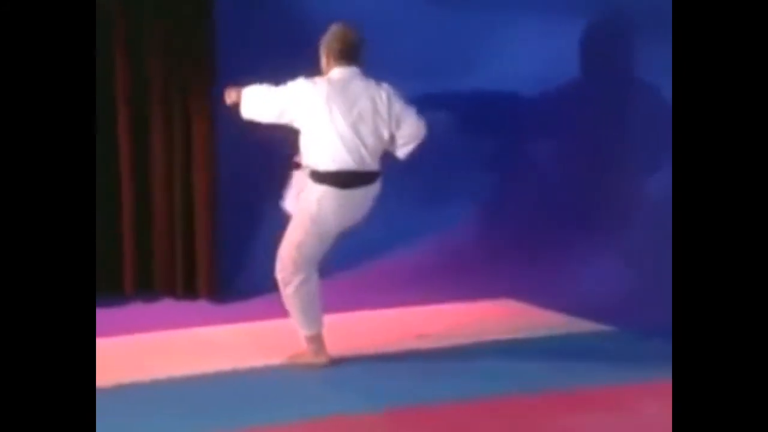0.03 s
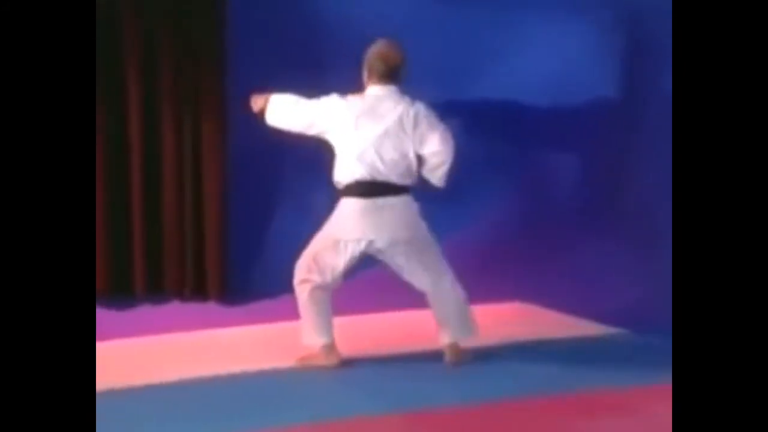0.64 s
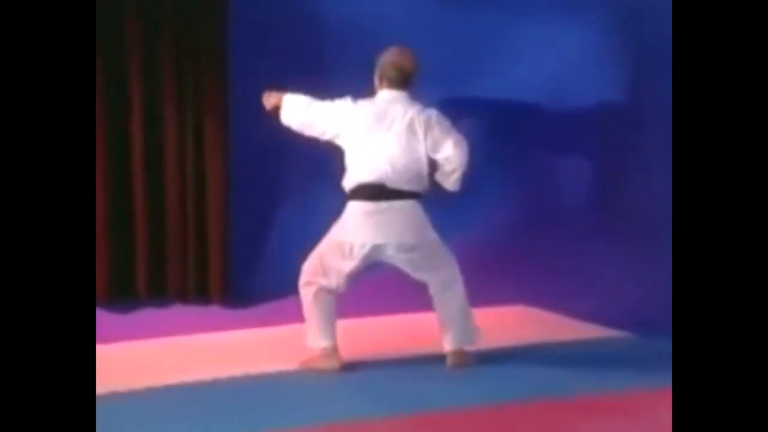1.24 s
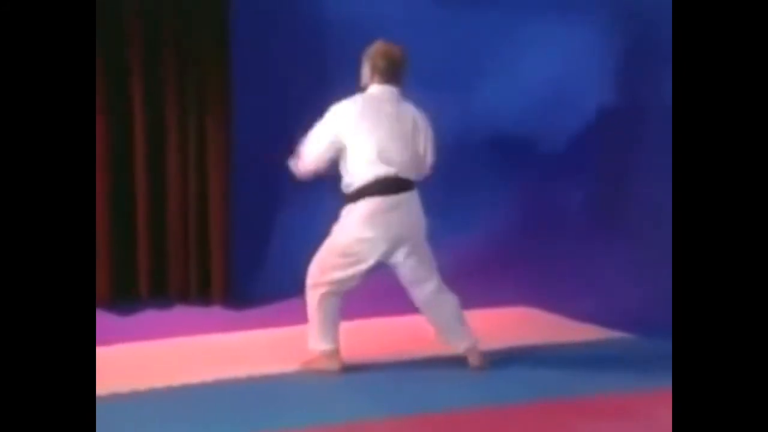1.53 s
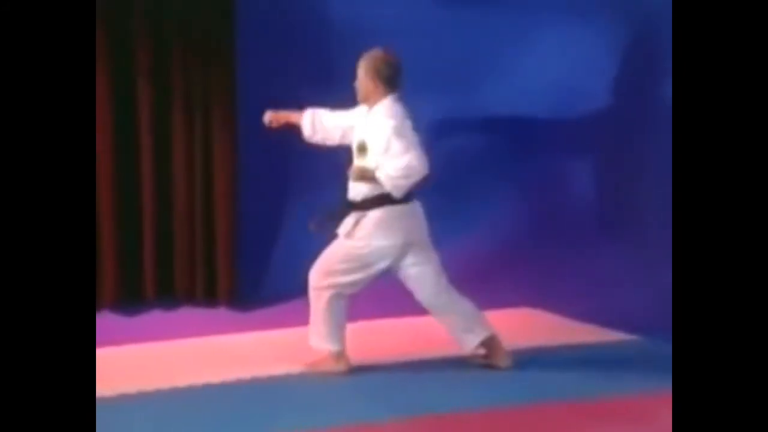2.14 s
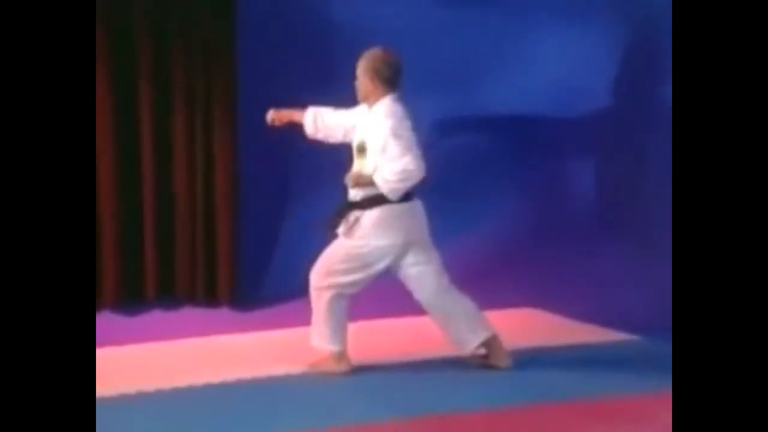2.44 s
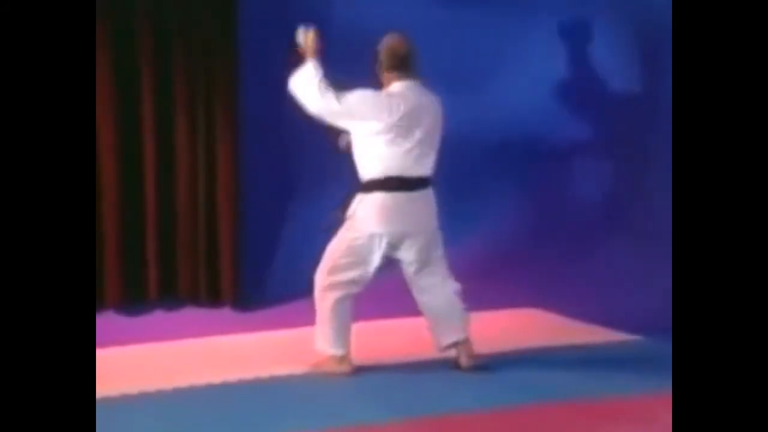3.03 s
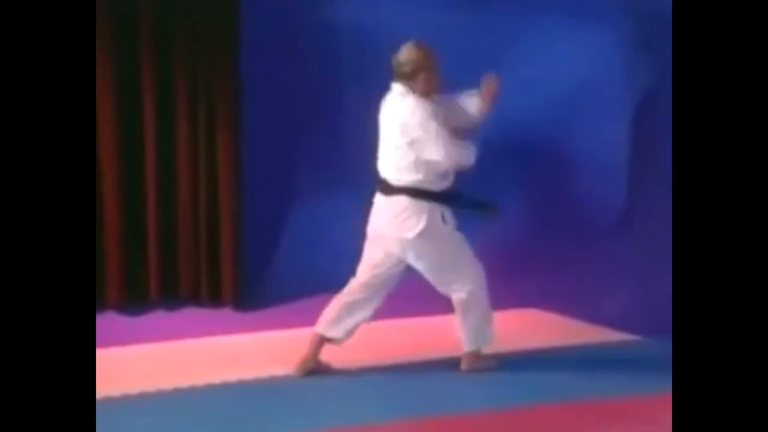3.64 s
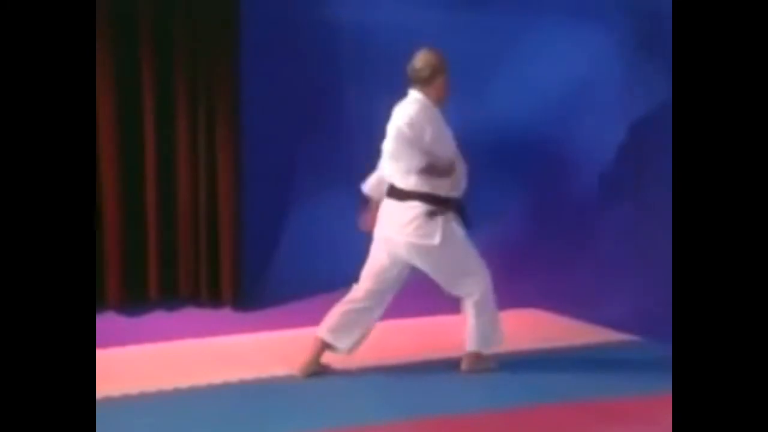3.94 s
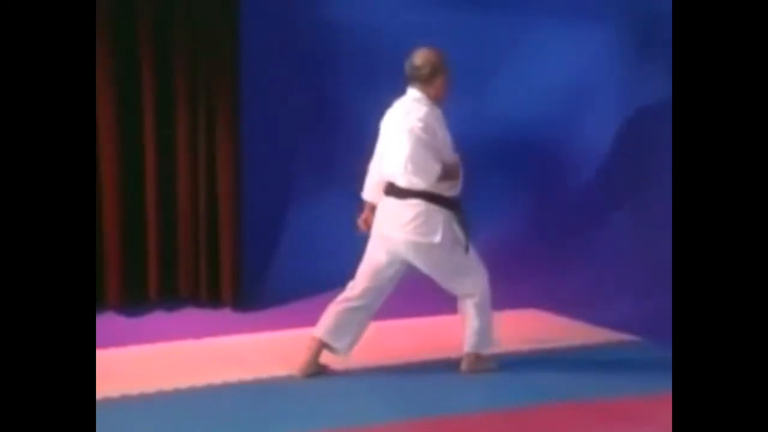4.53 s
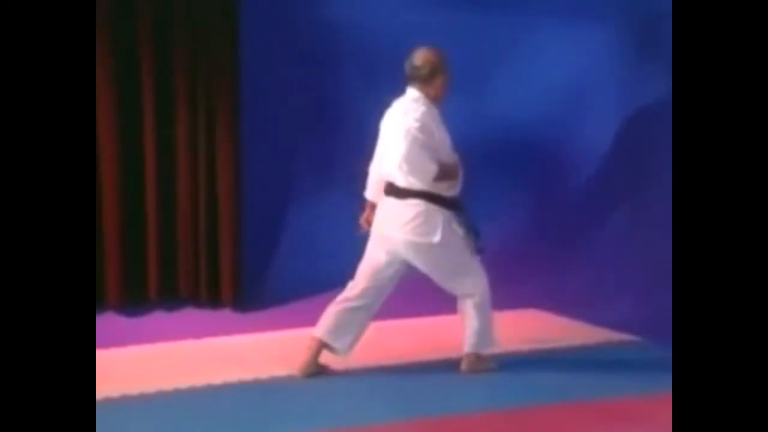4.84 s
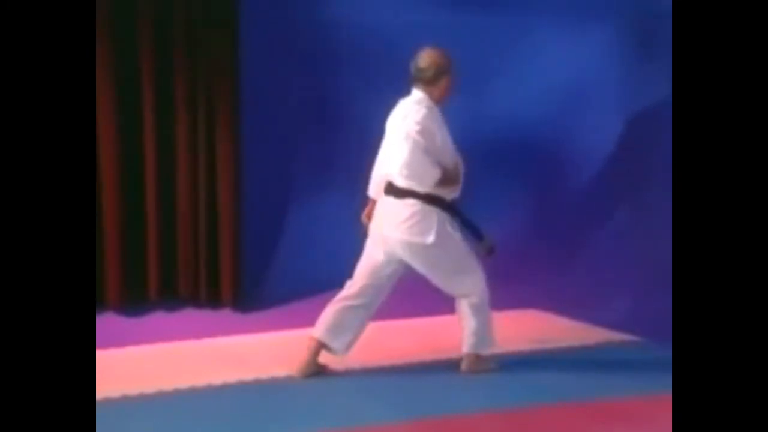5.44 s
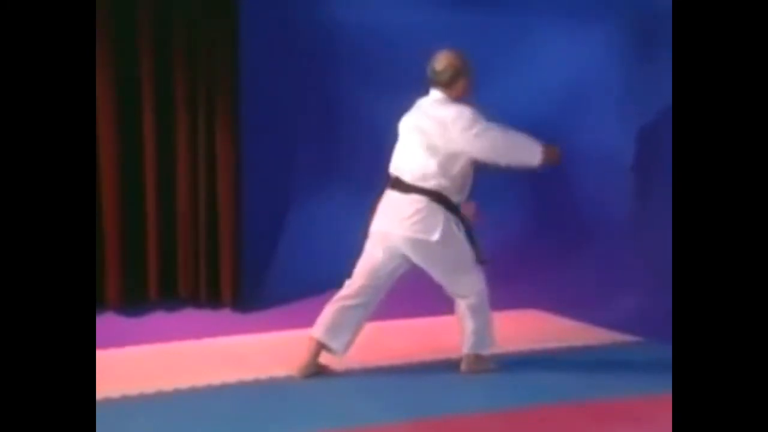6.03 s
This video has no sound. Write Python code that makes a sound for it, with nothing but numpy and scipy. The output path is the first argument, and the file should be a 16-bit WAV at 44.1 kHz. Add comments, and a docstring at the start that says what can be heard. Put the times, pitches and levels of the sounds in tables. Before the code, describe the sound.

In a ringing indoor hall, a bare foot stamps once on a mat. Thick cotton sleeves whoosh and crack taut with fast arm strikes, then bare soles scuff and step lightly before a second, weaker burst of flapping. After a pause the cloth rustles again briefly. The microphone is some way off, with steady electrical hum, rumble and faint hiss underneath.

```python
"""A barefoot martial artist stamps and strikes through a form on a padded mat in a hall.
The foot thuds on the mat, its skin slaps the cover, and the soles scuff as the feet shift.
With each arm strike the heavy cotton uniform rubs, swishes and flaps as it pulls taut.
The hall rings on; low rumble, mains hum, hiss and a thin electronic whine lie underneath."""
import sys
import numpy as np
from scipy import signal
from scipy.fft import rfft, irfft
from scipy.io import wavfile

SR = 44100
rng = np.random.default_rng(int(sys.argv[2]) if len(sys.argv) > 2 else 0)


def store_pcm(level_fs):
    """Save levels as 16-bit WAV."""
    pcm = np.round(np.clip(level_fs, -1, 1) * 32767).astype(np.int16)
    wavfile.write(sys.argv[1], SR, np.atleast_2d(pcm).T)


N = 276697


def gain_of(db):
    """Turns decibels into a number to multiply a sound by."""
    return 10 ** (np.asarray(db) / 20)


def evened(x):
    """Scales a signal to an average (rms) level of 1."""
    return x / np.sqrt(np.mean(x ** 2) + 1e-20)


def curve_at(points, hz):
    """Joins (Hz, value) points by straight lines on a log-frequency axis."""
    point_hz, value = np.transpose(points)
    return np.interp(np.log(hz + 1), np.log(point_hz + 1), value)


def add(mix, start_s, sound):
    """Mixes a sound in at its start time."""
    part = mix[max(round(start_s * SR), 0):][:len(sound)]
    part += sound[:len(part)]


def coloured(noise, colour):
    """Gives a long noise a colour (its balance of low and high), at level 1."""
    gain = gain_of(curve_at(colour, np.fft.rfftfreq(N, 1 / SR)))
    return evened(irfft(rfft(noise) * gain, N))


def click_of(colour, size=4096):
    """A click of this colour that starts at once and peaks at 1."""
    log_gain = np.log(gain_of(curve_at(colour, abs(np.fft.fftfreq(size, 1 / SR)))))
    spectrum = np.exp(np.conj(signal.hilbert(log_gain)))  # packs the energy at the start
    click = np.fft.ifft(spectrum).real[:size // 2]
    return click / abs(click).max()


def drift(rate_hz):
    """A slow random wobble, at level 1."""
    hz = np.fft.rfftfreq(N, 1 / SR)
    return evened(irfft(rfft(rng.standard_normal(N)) * np.exp(-(hz / rate_hz) ** 2), N))


def burst(click, decay_s, scatter):
    """A click trailed by smaller ones as the contact spreads."""
    t = np.arange(SR // 20) / SR
    contacts = scatter * rng.standard_normal(len(t)) * np.exp(-t / decay_s)
    contacts[0] = 1
    return signal.fftconvolve(contacts, click)


def short_note(hz, ring_s, rise_s):
    """A note that starts softly and dies within a few cycles."""
    t = np.arange(SR // 10) / SR
    return np.sin(2 * np.pi * hz * t) * np.exp(-t / ring_s) * (1 - np.exp(-t / rise_s))


# The colour of the room's noise. Each row: frequency in Hz, relative level in dB.
ROOM_COLOUR = [(10, -36.5), (28, -12.5), (45, -6), (70, -8.5), (90, -9), (130, -10.5), (170, -16),
               (250, -21), (400, -31.5), (750, -43), (1600, -49.5), (3200, -54.5), (6800, -56.5),
               (7900, -54), (9500, -60), (14000, -57.5)]
# How alike that noise is left and right. Each row: frequency in Hz, likeness (1 is identical).
ROOM_LIKENESS = [(30, 0.74), (150, 0.97), (600, 1), (2000, 0.99), (4000, 0.95), (8000, 0.59), (14000, 0.17)]
# Electrical tones. Each row: pitch in Hz, level in dB, left's lead in radians, waver in radians.
HUM_AND_WHINE = [(58.05, -50.5, 0.33, 0.49), (118.6, -59, .1, 0.96), (5330, -99, 0.52, 0.56),
                 (7868, -79, 0.37, .8), (14185, -89.5, 0.88, 1.1)]

def background(noise_db=-60):
    """The room rumbles and hisses while the electrical hum and whine waver."""
    hz, t = np.fft.rfftfreq(N, 1 / SR), np.arange(N) / SR
    left, other = rfft(rng.standard_normal((2, N)))
    likeness = np.clip(curve_at(ROOM_LIKENESS, hz), -1, 1)
    right = likeness * left + np.sqrt(1 - likeness ** 2) * other
    colour = gain_of(curve_at(ROOM_COLOUR, hz))
    mid_level = np.std(irfft(left * colour * (hz > 150) * (hz < 7000), N))
    out = gain_of(noise_db) / mid_level * irfft(np.array([left, right]) * colour, N)
    for tone_hz, db, lead, waver in HUM_AND_WHINE:
        phase = 2 * np.pi * tone_hz * t + waver * drift(15)
        out += np.sqrt(2) * gain_of(db + drift(10)) * np.sin([phase + lead, phase])
    lean_db = curve_at([(60, 1.3), (200, 0.0), (600, 0)], hz)  # the rumble leans left
    return irfft(rfft(out) * gain_of([lean_db, -lean_db]), N)


# How long the hall rings. Each row: frequency in Hz, seconds to fade by 60 dB.
HALL_FADE = [(60, 1.0), (170, 0.96), (350, 0.63), (1000, 0.66), (3000, 0.71), (5500, 0.47), (9000, 0.32)]
# Echoes off the walls and ceiling. Each row: delay in seconds, relative level in dB.
WALL_ECHOES = [(0.0135, -13.5), (0.0234, -9), (0.0364, -10), (.048, -19), (0.073, -10.5), (0.081, -9.5)]

def hall(sound, echo_db, tail_db, build_s=0.0079, dull_above_hz=1800):
    """The hall adds a few dull, scattered echoes, then a dense tail whose treble dies first."""
    hz, t, noise = signal.stft(rng.standard_normal(SR), SR, nperseg=256)
    fade = gain_of(-60 * t / curve_at(HALL_FADE, hz)[:, None])
    tail = signal.istft(noise * fade * (1 - np.exp(-t / build_s)), SR, nperseg=256)[1]
    echoes = np.zeros(len(tail))
    for delay, db in WALL_ECHOES:
        add(echoes, delay, gain_of(db + echo_db) * burst([1], decay_s=0.0093, scatter=0.06))
    dull_echoes = signal.lfilter(*signal.butter(1, dull_above_hz, fs=SR), echoes)
    response = gain_of(tail_db) * tail / np.linalg.norm(tail) + dull_echoes
    response[0] += 1  # the direct sound
    return signal.fftconvolve(sound, response)[:N]


def rustle(colour, slips_per_s, spread_db, flutter_db):
    """Countless small slips of the weave, clumped by the folds, blur into a rustle."""
    size = gain_of(spread_db * np.minimum(rng.exponential(1, N), 4))
    slips = size * rng.standard_normal(N) * (rng.random(N) < slips_per_s / SR)
    return evened(coloured(slips, colour) * gain_of(flutter_db * drift(19)))


# An arm or leg moves inside the cloth. Each row: time it reaches full speed, wind-up and hold,
# all in seconds, then rubbing level and billowing level in dB.
LIMB_MOVES = [(0.0, .1, .06, -70.5, -54), (0.207, 0.16, 0.37, -72.5, -68), (0.982, .1, 0.26, -73, -72.5),
              (1.498, 0.074, .07, -47, -43), (1.629, .03, .12, -48, -33.5), (1.834, 0.043, .12, -56, -37),
              (2.551, 0.21, .42, -61.5, -66.5), (3.021, 0.12, 0.28, -59, -55),
              (3.262, 0.098, .36, -51.5, -54), (3.719, 0.14, 0.1, -51, -39),
              (3.94, 0.079, .12, -60.5, -45.5), (5.6, 0.19, 0.5, -68, -72), (6.033, 0.058, .17, -60, -57),
              (6.262, 0.017, .04, -47, -62)]
# A sleeve whips past the jacket. Each row: peak time in seconds, level in dB, half length in seconds.
SLEEVE_SWISHES = [(1.523, -61.5, 0.072), (1.733, -66, 0.016), (1.864, -71.5, 0.01), (2.76, -76.5, 0.097),
                  (3.251, -61, 0.047)]
# The colours of moving cloth. Each row: frequency in Hz, relative level in dB.
RUB_COLOUR = [(150, -3), (350, -0.5), (550, 1), (950, -1), (1400, -6), (2300, -12), (3000, -21),
              (5000, -33), (9000, -70.5)]
BILLOW_COLOUR = [(50, -17.5), (110, -1.5), (200, 1.5), (330, -3.5), (500, -8.5), (900, -27.5), (2000, -85)]
HISS_COLOUR = [(800, -8), (2500, 3.5), (3800, 1.5), (5500, -2.5), (7500, -9), (9000, -16), (11000, -85.5)]

def uniform(settle_s=0.058, weave_hiss_db=-23):
    """With each move cotton rubs on cotton and billows round the limb; a fast sleeve hisses."""
    t = np.arange(N) / SR
    rub_power, billow_power = np.zeros((2, N))
    for at, wind_up, hold, rub_db, billow_db in LIMB_MOVES:
        # the limb gathers speed, holds it, then settles
        speed = np.exp(np.minimum(t - at, 0) / wind_up - np.maximum(t - at - hold, 0) / settle_s)
        rub_power += (gain_of(rub_db) * speed) ** 2
        billow_power += (gain_of(billow_db) * speed) ** 2
    rub = rustle(RUB_COLOUR, slips_per_s=5000, spread_db=0.0, flutter_db=1.37)
    billow = rustle(BILLOW_COLOUR, slips_per_s=1500, spread_db=3.5, flutter_db=1.5)
    hiss = coloured(rng.standard_normal(N), HISS_COLOUR)
    swish = sum(gain_of(db) * np.exp(-((t - at) / half) ** 2) for at, db, half in SLEEVE_SWISHES)
    hiss_power = swish ** 2 + gain_of(weave_hiss_db) ** 2 * rub_power  # rubbing hisses a little too
    return np.sqrt(rub_power) * rub + np.sqrt(billow_power) * billow + np.sqrt(hiss_power) * hiss


# Loose cloth pulls taut. Each row: start in seconds, thud level in dB, pitch in Hz, crack level in dB.
CLOTH_FLAPS = [(1.589, -26, 255.1, -35.5), (1.612, -35, 299.8, -34), (1.624, -22.5, 197, -24),
               (1.649, -19.5, 308, -31), (1.752, -27, 297.2, -44), (1.813, -19, 183.5, -26.5),
               (1.868, -22, 200, -30.5), (3.722, -27, 185.2, -29.5), (3.762, -28.5, 246, -35.5),
               (3.790, -29, 325, -35), (3.909, -32.5, 196.6, -37), (3.982, -35.5, 240, -35.5)]
# A cuff snaps at the end of a strike. Each row: start in seconds, level in dB.
CUFF_SNAPS = [(1.628, -42), (1.866, -50), (3.762, -38), (3.983, -47.5), (3.991, -50.5)]
# The colours of the crack and the snap. Each row: frequency in Hz, relative level in dB.
CRACK_COLOUR = [(150, -21), (400, 2), (580, 8), (730, 9), (1000, -1), (1400, -8), (2100, -18),
                (3200, -39.5), (6000, -46.5), (10000, -62)]
SNAP_COLOUR = [(500, -7), (1200, 7.5), (2300, 3.5), (3200, -9), (4800, -14), (6500, -21), (10000, -43)]

def flaps(rebound_s=0.0105, rebound_thud_db=-4.5, rebound_crack_db=-10.5):
    """A panel of cloth shoves the air, cracks as it pulls taut and swings back once; the cuffs snap."""
    out, crack, snap = np.zeros(N), click_of(CRACK_COLOUR), click_of(SNAP_COLOUR)
    for start, thud_db, hz, crack_db in CLOTH_FLAPS:
        thud = gain_of(thud_db) * short_note(hz, ring_s=0.0056, rise_s=0.00097)
        add(out, start, thud)
        add(out, start + rebound_s, gain_of(rebound_thud_db) * thud)
        for at, db in (start, crack_db), (start + rebound_s, crack_db + rebound_crack_db):
            add(out, at, gain_of(db) * burst(crack, decay_s=0.0051, scatter=0.1))
    for start, db in CUFF_SNAPS:
        add(out, start, gain_of(db) * burst(snap, decay_s=0.0043, scatter=0.21))
    return out


# A foot lands, ball first, then heel. Each row: start in seconds, blow level in dB, slap level in dB.
FOOT_BLOWS = [(0.504, -25.5, -42), (0.515, -19, -27), (0.523, -24.5, -39.5), (0.534, -24.5, -45),
              (0.543, -17.5, -41), (0.553, -10.5, -47), (3.618, -38.5, -55.5), (3.674, -33, -53)]
# The mat and the boards below ring. Each row: pitch in Hz, level in dB, seconds to fade by 60 dB.
MAT_NOTES = [(71, -16.5, 0.13), (372.4, -4.5, 0.045), (451.4, -6, 0.076), (663, -19, 0.047),
             (1420, -28.5, 0.034)]
# The colours of the mat's thud and the skin's slap. Each row: frequency in Hz, relative level in dB.
THUD_COLOUR = [(35, -13), (90, -3.5), (170, -8), (260, -9.5), (360, -1), (470, 0), (620, -9), (950, -19),
               (1300, -23), (2200, -26), (4000, -50), (8000, -75), (11000, -100)]
SLAP_COLOUR = [(200, -3.5), (700, 23), (1500, 5), (2700, 2), (4000, -2), (6000, -8.5), (7800, -15),
               (9200, -56.5)]
# A sole grips and slips with a hollow note. Each row: start in seconds, level in dB, pitch in Hz.
SOLE_SCUFFS = [(2.497, -39, 550), (2.572, -45.5, 800), (2.618, -45.5, 1090), (2.986, -34, 582),
               (3.018, -49, 547), (3.272, -33, 840), (3.618, -35.5, 929), (3.675, -33, 620),
               (3.720, -28, 750)]

def feet(thud_db=-3, give_s=0.00042):
    """Each blow thuds on the mat and sets it ringing; bare skin slaps and scuffs on the cover."""
    t = np.arange(SR // 8) / SR
    knock = sum(gain_of(db - 60 * t / fade) * np.sin(2 * np.pi * hz * t) for hz, db, fade in MAT_NOTES)
    knock *= 1 - np.exp(-(t / give_s) ** 2)  # the padding yields before it pushes back
    add(knock, 0, gain_of(thud_db) * click_of(THUD_COLOUR))
    out, slap = np.zeros(N), click_of(SLAP_COLOUR)
    for start, blow_db, slap_db in FOOT_BLOWS:
        add(out, start, gain_of(blow_db) * knock)
        add(out, start, gain_of(slap_db) * burst(slap, decay_s=0.0043, scatter=0.22))
    for start, db, hz in SOLE_SCUFFS:
        add(out, start, gain_of(db) * short_note(hz, ring_s=0.0029, rise_s=0.0006))
    return out


# The performer's sound comes slightly earlier on the left. Each row: frequency in Hz, lead in radians.
LEFT_LEAD = [(50, .3), (150, 0.26), (300, 0.099), (700, 0.018), (1200, 0.0071), (2200, 0.017),
             (4000, 0.059), (8000, .15)]

def scene():
    """The performer is heard from across the hall, almost alike left and right."""
    performer = hall(feet(), echo_db=-2.5, tail_db=-2.5)
    performer += hall(flaps(), echo_db=-6.5, tail_db=-2)
    performer += hall(uniform(), echo_db=-8.0, tail_db=-6.5)
    lead = curve_at(LEFT_LEAD, np.fft.rfftfreq(N, 1 / SR))
    stereo = irfft(rfft(performer) * np.exp(.5j * np.array([lead, -lead])), N)
    return stereo + background()


def record(dry):
    """Cuts away the very highest treble."""
    cutoff_hz = 14546
    low_pass = signal.firwin(511, cutoff_hz, window=("kaiser", 9), fs=SR)
    return signal.oaconvolve(dry, low_pass[None], "same")


dry = scene()
out = record(dry)
store_pcm(out)
```